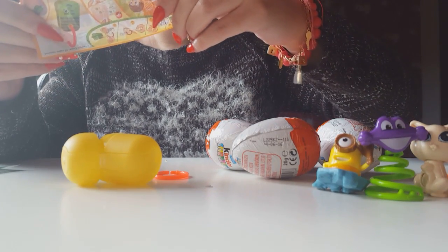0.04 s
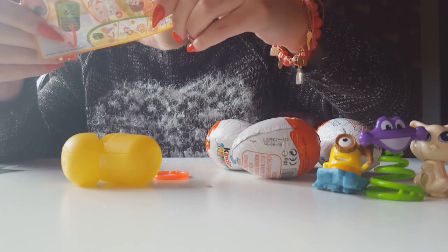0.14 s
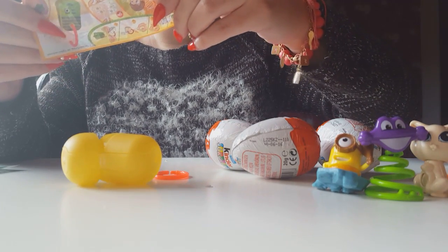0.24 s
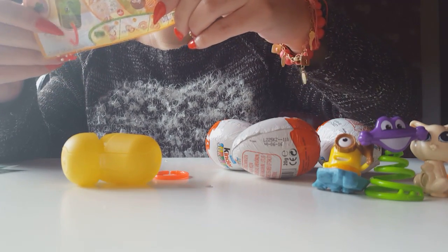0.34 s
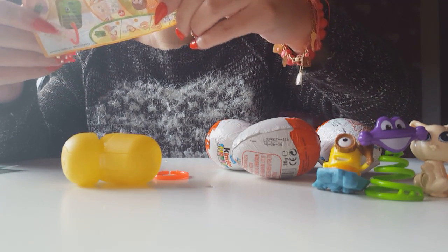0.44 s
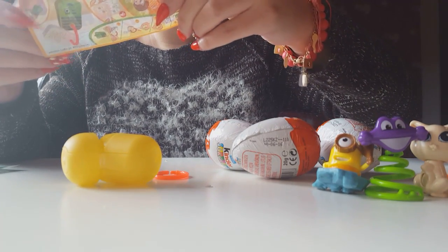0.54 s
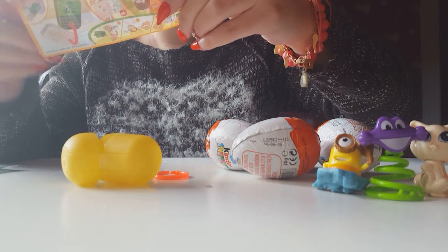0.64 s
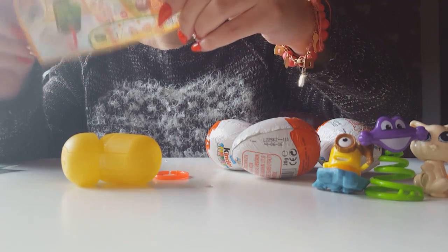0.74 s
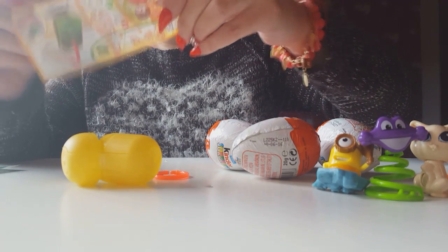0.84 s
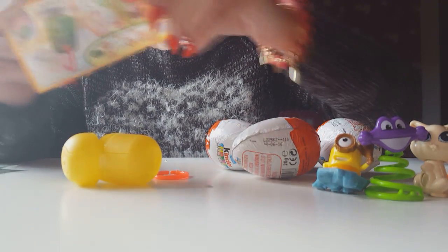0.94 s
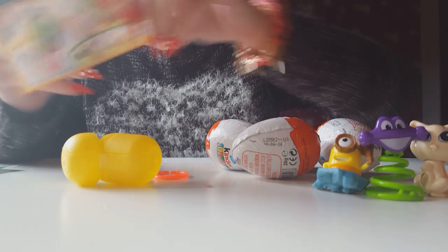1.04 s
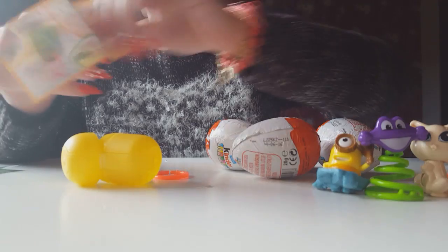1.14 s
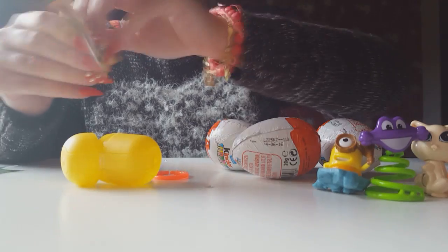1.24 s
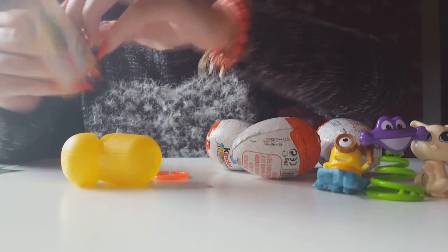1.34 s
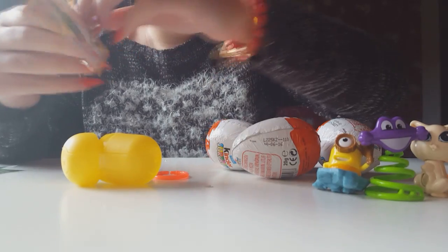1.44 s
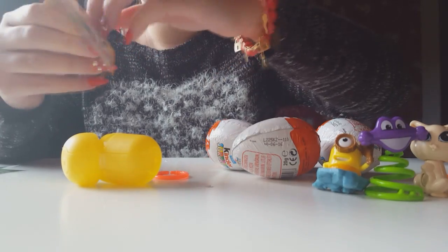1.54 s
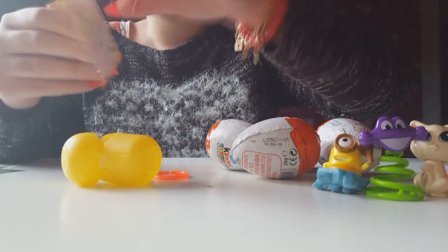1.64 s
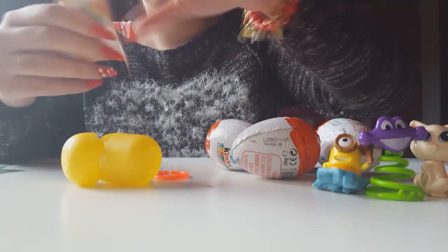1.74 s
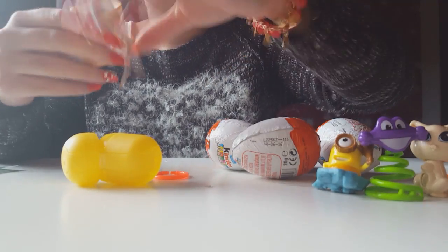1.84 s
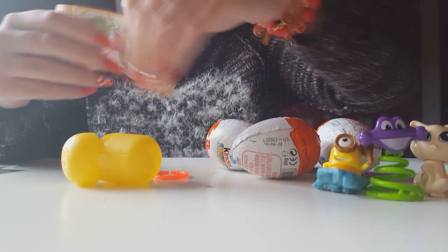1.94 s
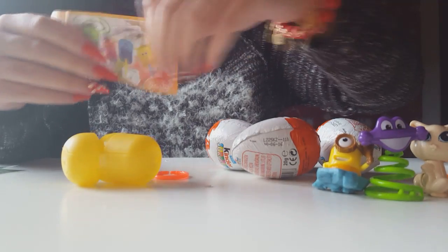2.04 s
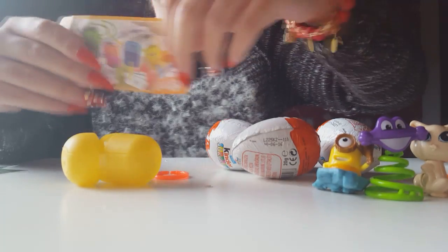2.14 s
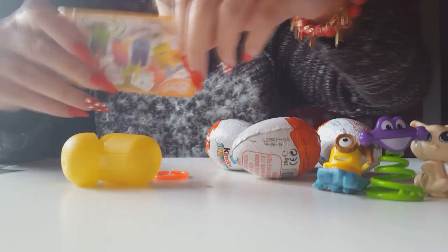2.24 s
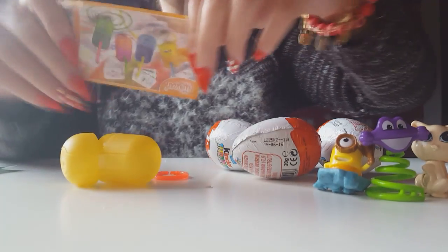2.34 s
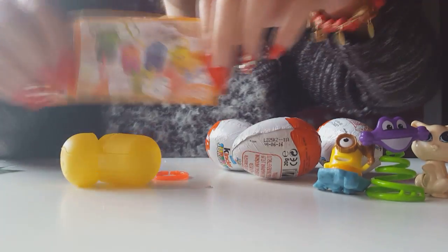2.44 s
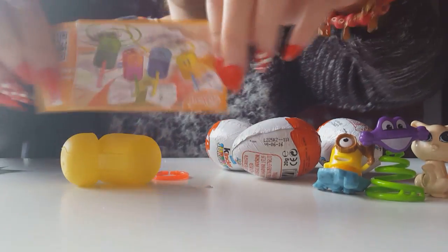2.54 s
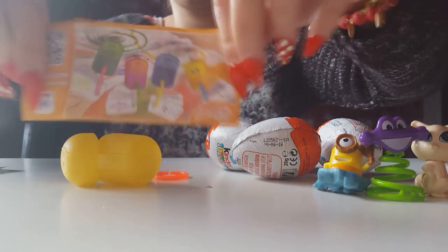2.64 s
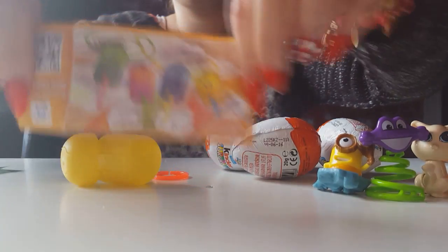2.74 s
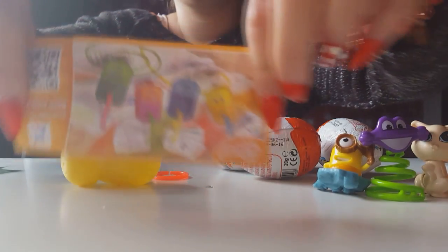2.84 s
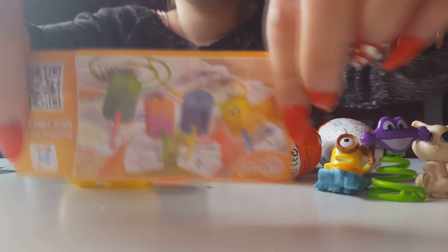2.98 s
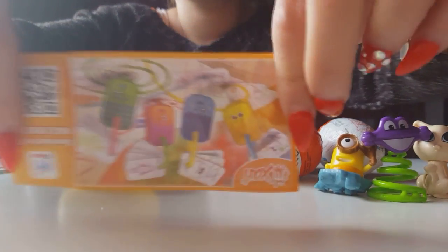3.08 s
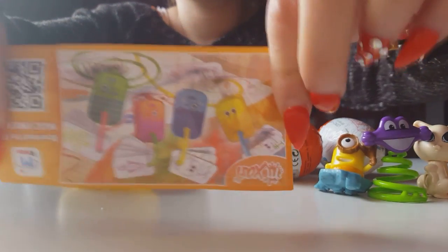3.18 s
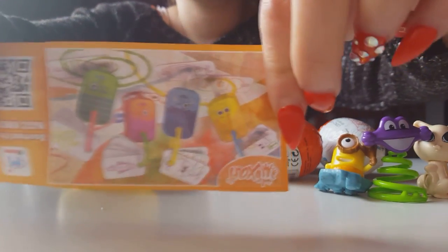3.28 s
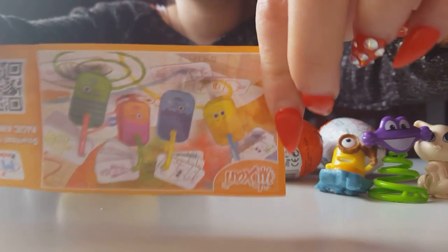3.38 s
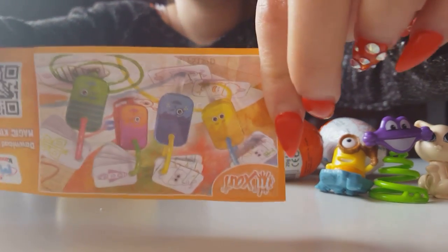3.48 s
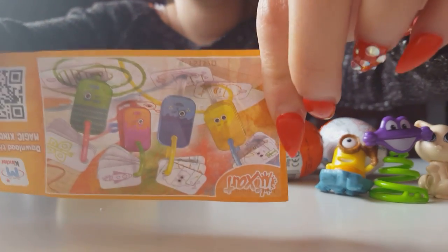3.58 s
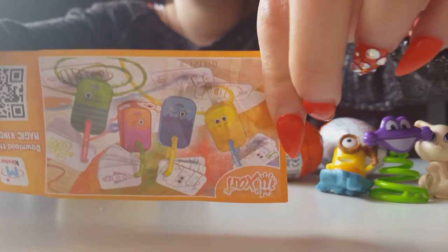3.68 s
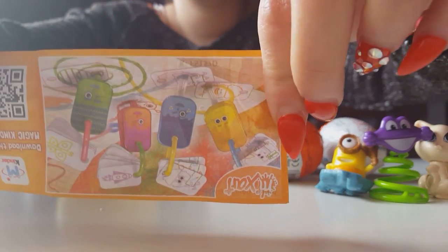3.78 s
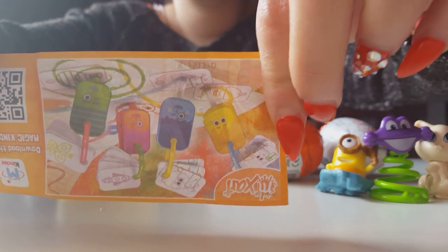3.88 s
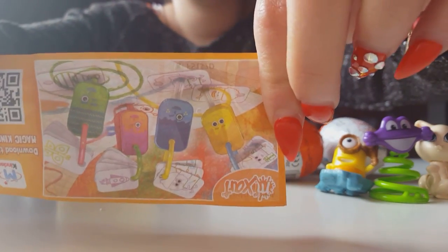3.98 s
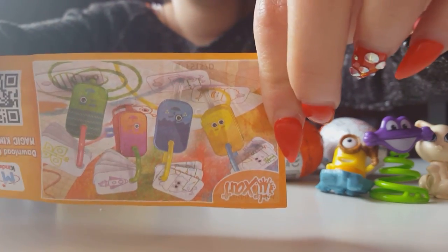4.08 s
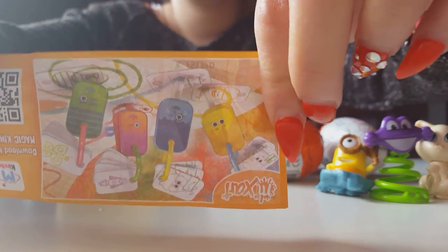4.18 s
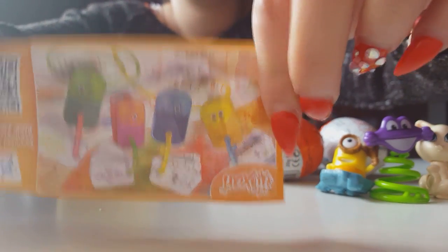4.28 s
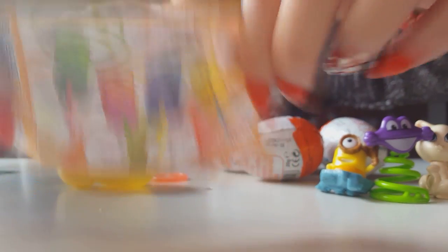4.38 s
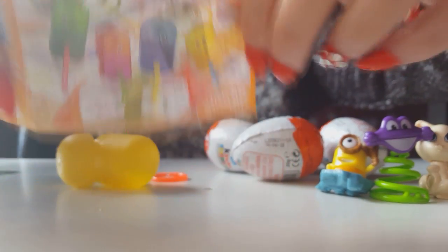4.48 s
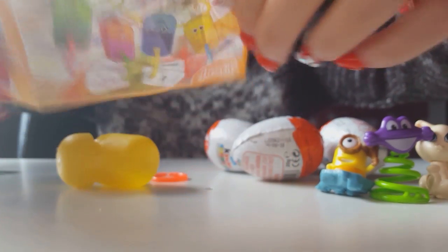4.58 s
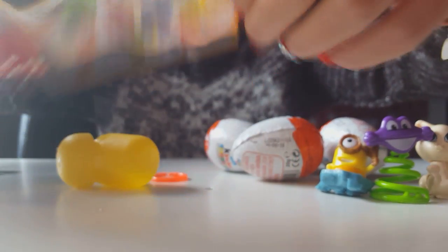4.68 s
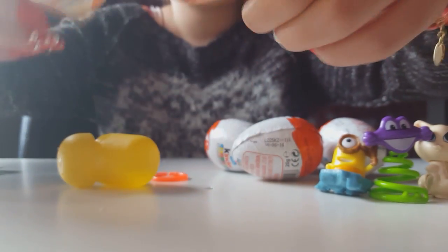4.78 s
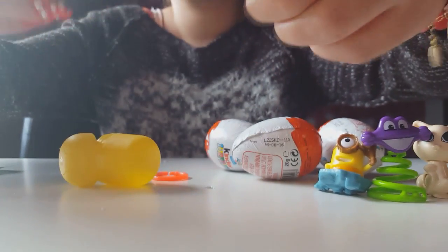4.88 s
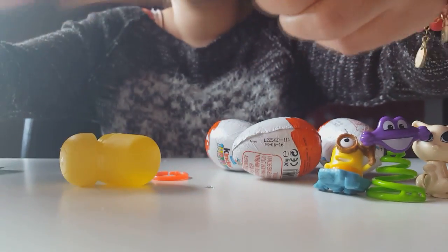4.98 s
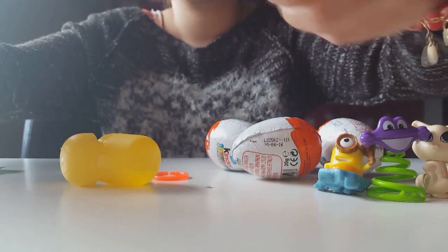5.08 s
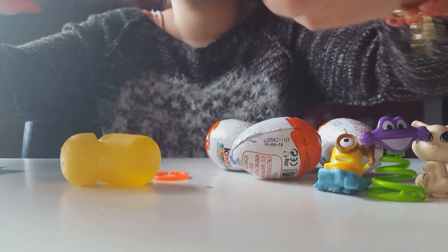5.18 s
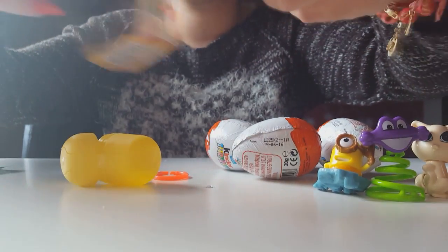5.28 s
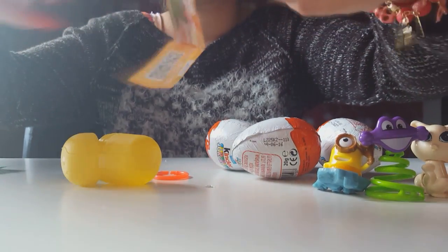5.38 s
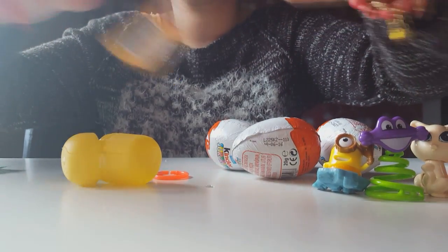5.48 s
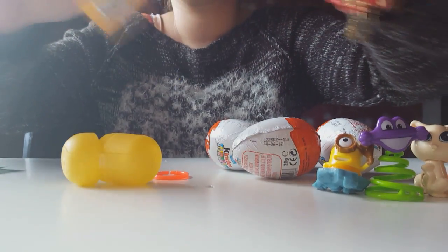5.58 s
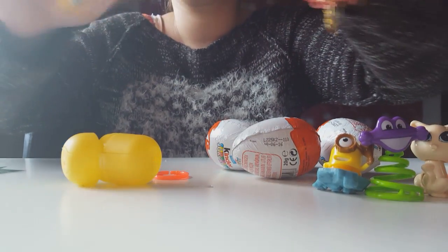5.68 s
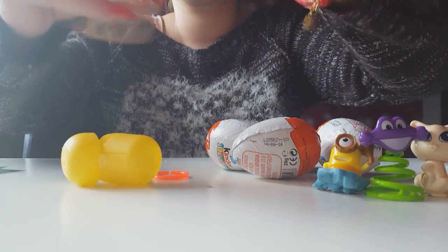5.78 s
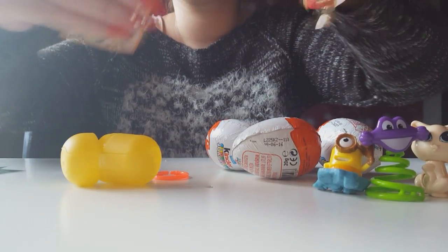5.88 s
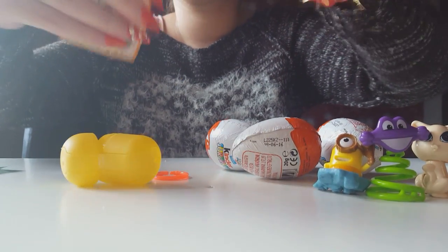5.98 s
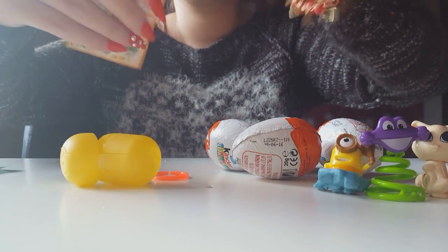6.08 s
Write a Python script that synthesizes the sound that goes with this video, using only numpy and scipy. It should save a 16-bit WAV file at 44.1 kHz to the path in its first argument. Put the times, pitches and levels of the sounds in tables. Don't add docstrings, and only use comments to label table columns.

```python
import sys
import numpy as np
from scipy import signal
from scipy.fft import rfft, irfft
from scipy.io import wavfile
from scipy.ndimage import map_coordinates

SR = 44100
rng = np.random.default_rng(int(sys.argv[2]) if len(sys.argv) > 2 else 0)


def wrap_up_sound(samples):
    columns = np.atleast_2d(samples).T
    tamed = np.clip(columns, -1, 1)
    steps = np.round(tamed * 32767).astype(np.int16)
    wavfile.write(sys.argv[1], SR, steps)


def rack_gain(trim_db):
    fader = np.asarray(trim_db, float)
    return 10 ** (fader / 20)


N = 269892

# t/s, peak level/dB, panel f/Hz, crackle above 4 kHz re panel/dB,
# table thump re panel/dB, slip decay/ms
CREASES = [(0.003, -22, 900, -42, -29, 0.95), (0.068, -36, 1040, -34, -10.5, 3.7),
           (0.148, -42, 1370, -22, -19, 1.2), (0.194, -54, 412, -11, -10, 2.1),
           (0.207, -16, 1080, -22, -28, 1.5), (0.287, -26.5, 500, -39, -19.5, 2.7),
           (0.389, -50.5, 613, -16, -8, 1.3), (0.462, -29, 1360, -20, -30, 2),
           (0.861, -27, 910, -36, -34, 1.6), (0.918, -46, 1520, -25, -24, 3.5),
           (0.95, -40.5, 923, -26, -25, 2.2), (1.075, -42.5, 1540, -14.5, -24, 1.9),
           (1.123, -21, 940, -30, -39, 2), (1.168, -27.5, 953, -33, -24, 1.5),
           (1.18, -29, 2450, -16, -27, 1.6), (1.205, -13.5, 1446, -17.5, -36, 1.3),
           (1.219, -15, 960, -9, -47, 1.7), (1.224, -16.5, 900, -11, -39, 1.5),
           (1.317, -29.5, 1010, -17, -29, 1.6), (1.343, -26, 2370, -20.5, -32, 1.5),
           (1.359, -27, 1000, -30, -41, 1.6), (1.411, -29.5, 1520, -17, -29, 1.2),
           (1.437, -28, 1510, -13, -35, 1.6), (1.463, -34, 1570, -27, -21, 1.6),
           (1.552, -40, 514, -1.5, -29, 1.6), (1.6, -41, 937, -15, -17, 1.6),
           (1.613, -32.5, 929, -27, -31, 2), (1.68, -36.5, 1610, -19, -22, 1.5),
           (1.699, -33.5, 939, -17, -26, 1.5), (1.714, -23.5, 890, -19, -28.5, 1.9),
           (1.743, -31.5, 1060, -16.5, -25, 1.6), (1.862, -43, 464, -12, -15, 1.4),
           (1.898, -40, 872, 0.5, -10, 1.5), (1.94, -17.5, 1400, -31, -34, 1.7),
           (2.012, -23, 970, 0, -13, 2.5), (2.017, -13.5, 910, -15, -32, 2.2),
           (2.03, -25.5, 950, 1, -22, 1.5), (2.071, -25, 525, -17, -17, 1.9),
           (2.078, -6, 1160, -26, -36, 2.2), (2.091, -13.5, 886, -6, -19, 1.2),
           (2.146, -7.5, 1200, -10, -31.5, 1.8), (2.21, -20, 584, -30, -19, 1.5),
           (2.282, -28.5, 517, -22, -18, 1.5), (2.321, -40.5, 816, -21, -6.5, 3.7),
           (2.374, -17, 1490, -18, -36, 1.4), (2.413, -23, 934, -21, -32, 1.8),
           (2.45, -30.5, 727, -27, -28, 1.5), (2.468, -25, 2060, -32, -25, 1.8),
           (2.542, -20.5, 840, -26, -25, 1.4), (2.551, -19, 1440, -34, -21.5, 1.8),
           (2.606, -23.5, 756, -30, -26, 1.5), (2.656, -29, 1420, -10, -22, 1.5),
           (2.703, -21.5, 1350, -30, -36, 2), (2.728, -23, 685, -37, -33, 1.7),
           (2.808, -26, 759, -27, -19, 1.5), (2.82, -28, 796, -9.5, -21, 1.5),
           (2.85, -12.5, 1220, -13, -39, 1.9), (3.007, -19, 827, -44, -29, 1.76),
           (3.056, -43, 643, -33, -5, 1.8), (3.137, -39.5, 1100, -20.5, -12.5, 1.3),
           (3.271, -47, 1040, -22.5, -10, 1.5), (3.291, -17.5, 734, -27.5, -24.5, 1.7),
           (3.512, -35, 1030, -34, -33.5, 0.85), (3.833, -54, 1130, -27, -12, 1.5),
           (3.935, -48, 2070, -2.5, -16.5, 1.5), (4.17, -46, 2680, -25.5, -16.5, 1.2),
           (4.318, -48.5, 3090, -7, -14.5, 1.5), (4.347, -44.5, 1030, -27, -12, 1.5),
           (4.361, -32, 410, -39, -24, 1.1), (4.391, -44.5, 401, -23, -6, 1.5),
           (4.407, -27.5, 730, -14.5, -11.5, 1.5), (4.448, -30.5, 1850, -16, -16, 1.7),
           (4.467, -28.5, 670, -14, -16, 1.6), (4.513, -26, 794, -19, -20, 1.7),
           (4.592, -17.5, 1890, -25, -26.5, 1.66), (4.625, -16, 775, -34, -33, 2),
           (4.707, -27, 690, -10, -16, 1.5), (4.741, -25.5, 604, -19.5, -19.5, 1.9),
           (4.796, -27, 1090, -37, -27, 2.2), (4.881, -38, 900, -24, -24, 1.8),
           (4.962, -37.5, 704, -15, -20, 2.9), (4.995, -32, 1120, -8, -21, 1.6),
           (5.026, -32.5, 496, -15, -31, 1.8), (5.036, -28, 514, 1.5, -33, 2.1),
           (5.096, -33.5, 1080, -17, -28, 3), (5.25, -25.5, 1140, -41, -33, 3.4),
           (5.288, -31, 630, -9.5, -25, 1.8), (5.324, -32.5, 646, -22, -28, 2),
           (5.413, -33, 2180, -20, -22, 3.1), (5.619, -34.5, 1520, -26.5, -19, 3.7),
           (5.79, -22, 1700, -13.5, -31.5, 1.8), (5.826, -21.5, 2880, -4, -37, 1.5),
           (5.832, -30, 1400, -1, -24, 2.6), (5.845, -19, 1500, -8, -25.5, 2.3),
           (5.864, -20.5, 990, -9, -22, 1.7), (6.078, -44, 1400, -5, -14, 1.8),
           (6.114, -31, 2100, -24, -36, 1.6)]
# t/s, flexing level/dB, sliding hiss level/dB, arm rumble level/dB
HANDLING_LEVELS = [(0.0, -57, -83, -63.5), (0.12, -79, -91, -66), (0.43, -67, -79, -64.5),
                   (0.61, -86, -91, -69), (0.92, -66.5, -84, -70), (1.19, -65.5, -73, -75),
                   (1.28, -59, -58, -64), (1.33, -45, -56, -61), (1.45, -55.5, -59.5, -65.5),
                   (1.57, -71, -67.5, -68), (1.69, -53, -62.5, -64), (1.81, -69.5, -72, -69),
                   (1.96, -44.5, -55.5, -54), (2.06, -47.5, -53, -54), (2.1, -47, -47, -52),
                   (2.16, -46, -53, -52), (2.22, -53.5, -62.5, -52), (2.38, -55, -61.5, -57.5),
                   (2.54, -42, -52, -55.5), (2.64, -44.5, -54, -53.5), (2.71, -62, -62, -52),
                   (2.8, -55.5, -75, -63), (2.86, -52, -62, -62), (3.0, -68, -87.5, -65),
                   (3.12, -66.5, -86, -62), (3.32, -80.5, -89, -67.5), (3.7, -80, -94, -72.5),
                   (4.23, -79.5, -87.5, -73.5), (4.4, -59.5, -74.5, -69), (4.53, -51, -65, -61),
                   (4.59, -57, -71, -57), (4.67, -60, -59.5, -60), (4.79, -71.5, -76, -64),
                   (5.08, -47.5, -59.5, -65.5), (5.17, -67.5, -71, -65.5), (5.42, -64, -73, -68.5),
                   (5.67, -83.5, -97, -72), (5.83, -50.5, -58, -58), (5.97, -54.5, -58.5, -54),
                   (6.12, -78, -76.5, -76)]
# t/s, left over right level/dB, lateness of left port/samples
HAND_PLACES = [(0, -0.8, 7.2), (.75, 2.5, -2.94), (1.25, 3.4, 2.5), (1.75, -2.3, 3.5), (2.25, -0.5, 0.33),
               (2.75, -1, 3.5), (3.25, 2.5, 4.5), (3.75, 6.9, -13), (4.25, 2.5, -5), (4.75, 1.5, 3.5),
               (5.04, -3.5, 3), (5.3, 6, 4), (5.75, 2.8, 3), (6.12, 0, 1)]
# f/Hz, width/Hz, level/dB
SHEET_MODES = [(881, 260, -2.3), (1500, 470, 1.5), (1884, 440, -6.5), (2550, 392, -2), (3520, 720, -5),
               (4740, 1300, -12.5), (545, 256, 0)]
# f/Hz, density level/dB
SLIDE_SPECTRUM = [(1470, -31), (2500, -2.5), (3800, -11.5), (7430, -9), (12600, -15), (16000, -31.5),
                  (16500, -56.5)]
# f/Hz, width/Hz, level/dB
TABLE_MODES = [(144.6, 40, -0.3), (95, 51, -3.5), (202, 65, 1.5), (319, 130, 0.5)]
# band centre f/Hz, t60/s, level/dB
ROOM_BANDS = [(253, 0.26, -19), (740, 0.2, -19), (1948, .17, -19), (5060, .12, -21.5), (11100, 0.072, -16)]
# f/Hz, density level/dB
AIR_SPECTRUM = [(18, -29), (30, -1.5), (48, -3), (146, -8), (242, -10.5), (298, -13.5), (533, -13.5),
                (953, -17.5), (2050, -14.5), (2220, -24), (2670, -21), (7470, -33), (15200, -33),
                (16500, -60.5)]
# f/Hz, correlation/1
PORT_LIKENESS = [(60, 0.98), (240, 0.54), (950, -0.08), (3770, 0.37), (15000, -0.26)]
# f/Hz, width/Hz, rms level/dB
APPLIANCE_HUMS = [(147.4, 7, -69), (199, 14, -82), (79, 11, -79), (1995, 4, -80)]


def rms_one(x):
    return x / np.sqrt(np.mean(x ** 2) + 1e-20)


def peak_one(x):
    return x / (np.max(np.abs(x)) + 1e-20)


def in_time(rows):
    s, *columns = np.transpose(rows)
    return [np.interp(np.arange(N) / SR, s, c) for c in columns]


def at_hz(points, hz):
    point_hz, value = np.transpose(points)
    return np.interp(np.log(np.maximum(hz, 1)), np.log(point_hz), value)


def coloured(x, spectrum):
    gain = rack_gain(at_hz(spectrum, np.fft.rfftfreq(x.shape[-1], 1 / SR)))
    return rms_one(irfft(rfft(x) * gain, x.shape[-1]))


def resonate(x, hz, width):
    r = np.exp(-np.pi * width / SR)
    feedback = [1, -2 * r * np.cos(2 * np.pi * hz / SR), r * r]
    return signal.lfilter((1 - r * r) / 2 * np.array([1, 0, -1]), feedback, x)


def body(x, modes):
    return sum((-1) ** k * rack_gain(db) * resonate(x, hz, width) for k, (hz, width, db) in enumerate(modes))


def snaps(crackle_db=11, thump_db=8, scatter_db=5):
    size = 4096
    out = np.zeros((2, N + size))
    t = np.arange(size) / SR
    treble = signal.butter(3, 4000, "high", fs=SR, output="sos")
    bass_cut = signal.butter(2, 380, "high", fs=SR, output="sos")
    slips = rng.standard_normal((len(CREASES), 3, size)) ** 3
    luck = rng.standard_normal((len(CREASES), len(SHEET_MODES)))
    push = t / 0.0015 * np.exp(-t / 0.0011)
    thump = peak_one(body(push, TABLE_MODES))
    for (s, peak_db, hz, bright_db, low_db, ms), slip, chance in zip(CREASES, slips, luck):
        attack = np.minimum(t / 0.00047, 1)
        fade = np.exp(-t * 1000 / np.clip(ms, 0.2, 12)) * attack
        modes = [(f * (1 + 0.079 * c), w, db + scatter_db * c)
                 for (f, w, db), c in zip(SHEET_MODES, chance)]
        force = slip[0] * fade
        panel = body(force, modes) + rack_gain(6) * resonate(force, hz, 0.19 * hz)
        panel = peak_one(signal.sosfilt(bass_cut, panel))
        split_slip = 0.5 * slip[0] + 0.95 * slip[1:]
        crackle = peak_one(signal.sosfilt(treble, split_slip * fade ** 0.9))
        snap = panel + rack_gain(bright_db + crackle_db) * crackle + rack_gain(low_db + thump_db) * thump
        at = round(s * SR)
        out[:, at:at + size] += rack_gain(peak_db) * snap
    return out[:, :N]


def drift(rate):
    r = np.exp(-2 * np.pi * rate / SR)
    wander = signal.lfilter([1], [1, -2 * r, r * r], rng.standard_normal(N + SR))
    return rms_one(wander[SR:])


def grains(per_s, spread_db, clump_db):
    sizes = rack_gain(spread_db * np.minimum(rng.exponential(1, (2, N)), 5))
    sizes = sizes * rng.choice([-1, 1], (2, N))
    slipping = rng.random((2, N)) < per_s * rack_gain(clump_db * drift(25)) / SR
    return rms_one(sizes * slipping + 1e-18)


def rustle(flex_db, hiss_db):
    slips = grains(per_s=2500, spread_db=3.0, clump_db=5)
    flex = rms_one(body(slips[0] + 0.31 * slips, SHEET_MODES))
    fine = grains(per_s=9800, spread_db=-3.0, clump_db=3.5)
    hiss = coloured(0.32 * fine[0] + 1.3 * fine[::-1], SLIDE_SPECTRUM)
    flexing = rack_gain(flex_db + 3.2 * drift(9.5)) * flex
    sliding = rack_gain(hiss_db + 1.5 + 3.6 * drift(13)) * hiss
    return flexing + sliding


def arms(rumble_db):
    shake = rng.standard_normal((3, N))
    rumble = rms_one(body(shake[0] + 0.24 * shake[1:], TABLE_MODES))
    return rack_gain(rumble_db + 2.5 * drift(13)) * rumble


def placed(x):
    pan_db, late = in_time(HAND_PLACES)
    here = np.arange(N)
    left = map_coordinates(x[0], [here - late / 2], order=3)
    right = map_coordinates(x[1], [here + late / 2], order=3)
    return np.array([left * rack_gain(pan_db / 2), right * rack_gain(-pan_db / 2)])


def room(x):
    t = np.arange(SR // 2) / SR
    tail = 0
    for hz, t60, level_db in ROOM_BANDS:
        band = signal.butter(1, [hz / 1.61, min(hz * 1.61, 19000)], "band", fs=SR, output="sos")
        dying = rack_gain(-60 * t / t60) * np.clip(t / 0.003, 0, 1)
        noise = signal.sosfilt(band, rng.standard_normal((2, len(t))))
        tail = tail + rack_gain(level_db - 14.5) * noise * dying
    return signal.fftconvolve(x, tail, axes=1)[:, :N]


def air(level_db=-64):
    mid, side = rfft(rng.standard_normal((2, N)))
    alike = np.clip(at_hz(PORT_LIKENESS, np.fft.rfftfreq(N, 1 / SR)), 0, 1)
    opposite = np.array([[1], [-1]])
    pair = irfft(np.sqrt(1 + alike) * mid + np.sqrt(1 - alike) * side * opposite, N)
    white = rng.standard_normal(N)
    hums = sum(rack_gain(db) * rms_one(resonate(white, hz, width)) for hz, width, db in APPLIANCE_HUMS)
    return rack_gain(level_db) * coloured(pair, AIR_SPECTRUM) + hums


def scene():
    flex_db, hiss_db, rumble_db = in_time(HANDLING_LEVELS)
    paper = placed(snaps() + rustle(flex_db, hiss_db))
    return paper + room(paper) + arms(rumble_db) + air()


def roll_off(x):
    return signal.sosfilt(signal.butter(12, 16820, fs=SR, output="sos"), x)


def record(dry):
    return roll_off(dry - 0.0005)


dry = scene()
out = record(dry)
wrap_up_sound(out)
```